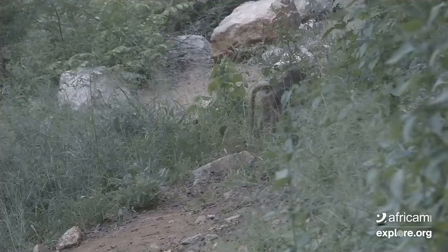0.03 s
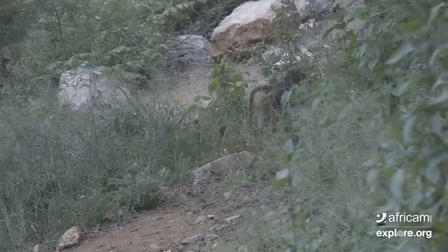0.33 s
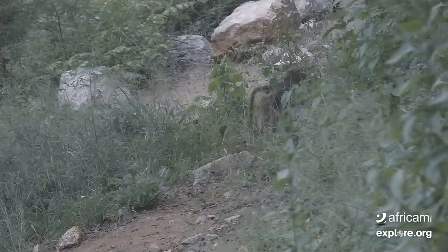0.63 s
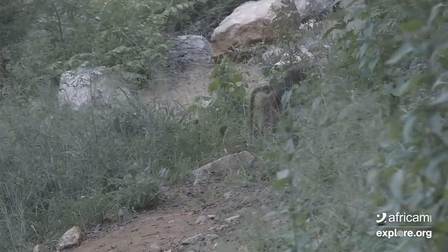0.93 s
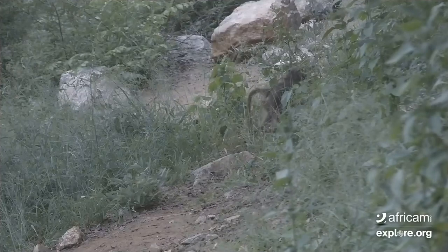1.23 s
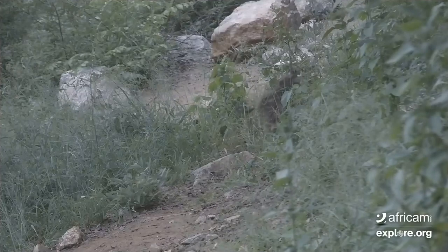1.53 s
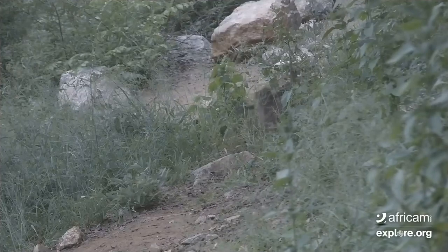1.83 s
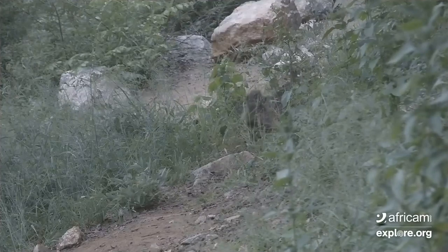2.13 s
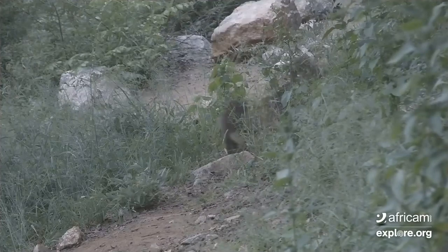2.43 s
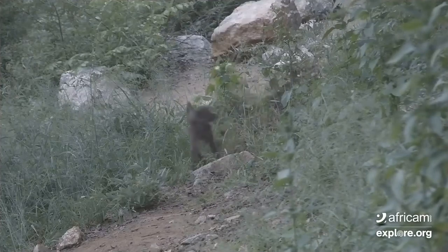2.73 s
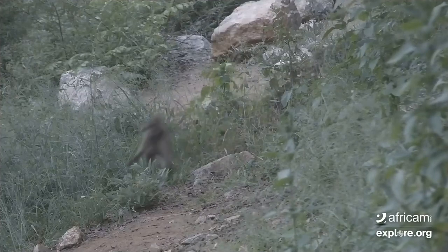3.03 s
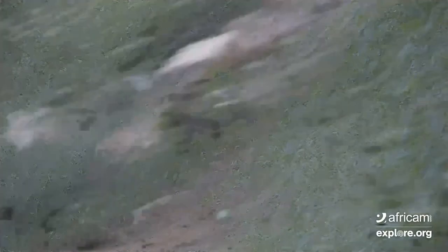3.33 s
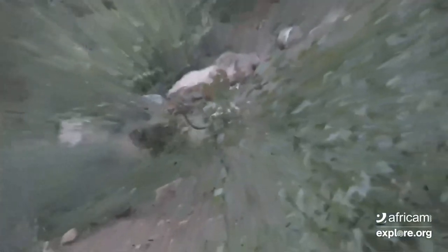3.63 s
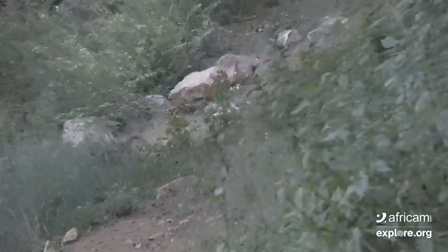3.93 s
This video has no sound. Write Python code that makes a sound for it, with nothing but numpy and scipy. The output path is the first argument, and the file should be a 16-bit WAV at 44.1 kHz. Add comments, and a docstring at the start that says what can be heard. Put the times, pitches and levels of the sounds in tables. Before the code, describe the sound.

Baboons scramble down a rocky slope, their dull footfalls and knocking stones light at first, then loudest from about 1.3 to 2.4 seconds, briefly overloading the microphone. Rubble shifts and plants rustle, with a faint low rumble. A twig snaps sharply at 2.6 seconds, and stones clatter again from 3.4 to 4. A songbird's quick whistles and chirping insects continue throughout, over steady hiss and a faint electrical whine.

```python
"""A rocky, overgrown slope, with baboons scrambling down it: feet knock dully, loose stones clack,
rubble shifts, plants brush aside and dry twigs snap. A songbird warbles in quick, arched whistles and
insects chirp in threes, over a trilling chorus of their kind and faint birds across the valley.
The outdoor microphone adds hiss, a thin whine and a mains sizzle, and overloads on the hardest knocks."""
import sys
import numpy as np
from scipy import signal
from scipy.fft import rfft, irfft
from scipy.io import wavfile

SR = 44100
rng = np.random.default_rng(int(sys.argv[2]) if len(sys.argv) > 2 else 0)


def transcribe(signal):
    """Save signal, clipped to [-1, 1], as a 16-bit WAV file at the path in sys.argv[1]."""
    frames = np.atleast_2d(signal).T
    limited = np.clip(frames, -1, 1)
    pcm = np.round(limited * 32767).astype(np.int16)
    wavfile.write(sys.argv[1], SR, pcm)


N = 176400

# tone of the stony ground (frequency [Hz], relative level [dB])
GROUND_TONE = [(20,-54),(50,-40),(80,-34),(150,-25.5),(300,-14),(450,-6),(630,2.5),(800,-5),(1100,-18),(1600,-19.5),(2500,-37.5),(5000,-57),(14000,-52)]
CHIRP_TOP_HZ, CHIRP_GAP_S = 5385, 0.0313


def amp(db):
    """Decibels to gain."""
    return 10 ** (np.asarray(db) / 20)


def unit(x):
    """Scales to rms 1."""
    return x / np.sqrt(np.mean(x ** 2) + 1e-20)


def add(mix, start, sound):
    """Mixes a sound in at start seconds."""
    part = mix[max(0, round(start * SR)):][:len(sound)]
    part += sound[:len(part)]


def fader(points):
    """Gain ride through (time [s], level [dB]) points."""
    return amp(np.interp(np.arange(N) / SR, *np.transpose(points)))


def colour(x, points):
    """Minimum-phase EQ of unit energy, shaped by (frequency [Hz], relative level [dB]) points."""
    hz, db = np.transpose(points)
    log_hz = np.log(abs(np.fft.fftfreq(4096, 1 / SR)) + 1)
    log_gain = np.log(amp(np.interp(log_hz, np.log(hz), db)))
    taps = np.fft.ifft(np.exp(np.conj(signal.hilbert(log_gain)))).real[:2048]
    return signal.oaconvolve(x, taps / np.linalg.norm(taps))[:len(x)]


def drift(rate_hz):
    """Smooth random motion of rms 1."""
    rolloff = 1 + (np.fft.rfftfreq(N, 1 / SR) / rate_hz) ** 4
    return unit(irfft(rfft(rng.standard_normal(N)) / rolloff, N))


def grains(per_s, spread_db):
    """Tiny impacts of uneven size at random times, rms 1."""
    size = amp(spread_db * np.minimum(rng.exponential(1, N), 4))
    return unit(size * rng.choice([-1, 1], N) * (rng.random(N) < per_s / SR))


def decay(t, t60):
    """Falls 60 dB in t60 seconds."""
    return np.exp(-np.log(1000) * t / t60)


def echoes(x, t60, wet_db):
    """Adds scattered reflections from rocks and bushes."""
    t = np.arange(SR // 2) / SR
    taps = rng.standard_normal(len(t)) * (rng.random(len(t)) < 1 / 20) * decay(t, t60) * (t > 0.004)
    return x + amp(wet_db) * signal.oaconvolve(x, taps / np.linalg.norm(taps))[:N]


def whistle(hz, fade_s=0.0024):
    """A sine along a pitch curve, with soft ends."""
    t = np.arange(len(hz)) / SR
    gate = np.sin(np.pi / 2 * np.minimum(np.minimum(t, t[-1] - t) / fade_s, 1))
    return np.sqrt(2) * gate * np.sin(2 * np.pi * np.cumsum(hz) / SR)


def knocks(thud_ratio=0.39, rubble_db=-11.5, rubble_rise_s=0.0019):
    """Each blow rings briefly, its pitch sinking as the contact softens, thuds, and stirs the rubble."""
    # feet and stones landing (time [s], level [dB], pitch [Hz], relative thud [dB], settling time [s])
    blows = [(0.175,-17.5,714,-8,0.3),(.317,-18.5,660,-9.5,0.057),(.578,-17,520,-11,0.048),(.606,-20.5,553,-12,0.08),(0.836,-12,660,-18,0.15),(.861,-10,605,-4,0.083),(1.013,-10.5,600,-16,.07),(1.175,-10.5,590,-18,0.09),
             (1.3145,-1.5,650,-14,0.074),(1.507,-12,584,-4,0.14),(1.5585,-4,710,-12,0.032),(1.576,-1,677,-24,0.14),(1.596,-8.5,720,-17.5,0.13),(1.629,-8,634,-23,0.098),
             (1.898,0.5,621,-13,0.18),(1.934,3,588,-16,0.11),(1.945,2,670,-17,0.11),(1.957,0,753,-19,0.088),(1.974,-1,615,-16,0.047),(2.0075,2.5,556,-24,0.093),
             (2.130,-1.5,620,-12,0.11),(2.145,-3,656,-20,0.11),(2.195,-5.5,763,-13,0.086),(2.347,2.5,704,-13,0.3),(2.4,-7,567,-24,0.12),(2.421,-8,560,-30,0.2),(2.45,-7,830,-22,0.051),(2.524,-7.5,645,-24,0.037),(2.7185,-1,693,-30,0.064),
             (3.07,-17.5,620,4.5,0.11),(3.142,-9,680,-3,0.15),(3.391,-7,673,-30,0.035),(3.438,-2.5,584,-21,0.061),(3.446,-4,527,-16,.09),(3.457,-6,628,-16,0.25),(3.51,-8.5,546,-31,0.22),
             (3.659,-10,640,-18,0.088),(3.706,-2.5,623,-26,0.039),(3.729,-2,400,-31,0.04),(3.754,-7.5,390,-23,0.055),(3.7805,-2,760,-14,0.07),(3.8055,-2,648,-12,0.1),(3.97,-2,673,-4.5,0.041)]
    t = np.arange(SR // 2) / SR
    bend = 1 + 0.16 * np.exp(-t / 0.0015)
    attack = 1 - np.exp(-t / 0.00035)
    stir_attack = 1 - np.exp(-t / rubble_rise_s)
    hits, stir = np.zeros((2, N))
    for start, db, hz, thud_db, settle in blows:
        phase = 2 * np.pi * np.cumsum(hz * bend) / SR
        ring = np.sin(phase) * decay(t, t60=0.032)
        thud = amp(thud_db) * np.sin(thud_ratio * phase) * decay(t, t60=0.019)
        add(hits, start, amp(db) * (ring - thud) * attack)
        add(stir, start, amp(db + rubble_db) * decay(t, settle) * stir_attack)
    hits = signal.lfilter(*signal.butter(1, 110, "high", fs=SR), hits)
    debris = colour(stir * grains(per_s=1500, spread_db=1.5), GROUND_TONE)
    return echoes(hits + debris, t60=0.17, wet_db=-8)


def clacks():
    """Stone meets stone: a hard, bright note that dies at once."""
    # stone strikes (time [s], level [dB], pitch [Hz])
    strikes = [(1.9338,-7,1350),(3.706,-12,1250),(3.7805,4,1100),(3.803,-13,2400),(3.97,-8,1700)]
    t, out = np.arange(SR // 20) / SR, np.zeros(N)
    for start, db, hz in strikes:
        attack = np.minimum(t * hz, 1)
        add(out, start, amp(db) * np.sin(2 * np.pi * hz * t) * decay(t, t60=0.016) * attack)
    return out


def rubble():
    """Small stones tumble against the ground in clumps."""
    # rubble shifting between the knocks (time [s], level [dB])
    shifting = [(0,-40.5),(.5,-35),(.62,-30),(.95,-25.5),(1.25,-20.5),(1.47,-28.5),(1.6,-16),(1.85,-23.5),(1.96,-17),(2.08,-15),(2.3,-21),(2.42,-22),(2.8,-22),(3.0,-22),(3.2,-19.5),(3.37,-27.5),(3.6,-27.5),(3.84,-18.5),(3.94,-24.5),(4,-13)]
    stones = grains(per_s=1100, spread_db=1)
    clumps = unit(amp(3.13 * drift(rate_hz=13.3)))
    return colour(stones * fader(shifting) * clumps, GROUND_TONE)


def rumble():
    """A low, uneven rumble, ending in a short bump as the sound cuts off."""
    # low swells and the closing bump (time [s], level [dB])
    swells = [(0,-72),(.7,-69),(1.45,-55),(1.58,-44.5),(1.85,-50),(1.96,-44),(2.1,-46),(2.36,-56),(2.6,-62),(2.75,-38.5),(2.9,-61),(3.15,-48),(3.35,-48.5),(3.75,-52),(3.92,-44),(4,-35)]
    # tone of the rumble (frequency [Hz], relative level [dB])
    low_tone = [(20,-12),(45,-36),(78,10),(100,4),(150,7.5),(250,-13),(500,-47),(14000,-87)]
    return colour(grains(per_s=1200, spread_db=2.5) * fader(swells), low_tone)


def plants():
    """Leaves and dry grass crackle in clumps."""
    # plants brushed aside (time [s], level [dB])
    brushing = [(0,-63),(.99,-29.5),(1.02,-20),(1.1,-27),(1.3,-27),(1.47,-34),(1.6,-28),(1.86,-28.5),(1.97,-19.5),(2.1,-27),(2.3,-32),(2.36,-22.5),(2.43,-33),(2.47,-25),(2.64,-20.5),(2.82,-20),(2.95,-29),(3.2,-28),(3.35,-31.5),(3.65,-31),(3.82,-26),(3.95,-31.5),(4,-17.5)]
    # tone of the foliage (frequency [Hz], relative level [dB])
    leaf_tone = [(60,-36),(300,-9.5),(800,14),(1500,4),(2500,4.5),(4000,-2.5),(6000,-2),(8000,-14.5),(14000,-56)]
    crackle = grains(per_s=3000, spread_db=-1.5)
    clumps = unit(amp(2 * drift(rate_hz=48)))
    return colour(crackle * fader(brushing) * clumps, leaf_tone)


def scrapes(half_width=0.19):
    """Feet scrape grit and bodies swish through grass: dense grains that swell fast and die away."""
    # scrapes and swishes (time [s], length [s], level [dB], band centre [Hz])
    strokes = [(1.02,0.25,-25,4900),(1.56,0.4,-29.5,1460),(1.95,0.15,-23,1980),(2.352,0.16,-34,6300),(2.432,0.31,-25,1530),(2.63,0.065,-24,5170)]
    out, grit = np.zeros(N), grains(per_s=6000, spread_db=5.5)
    for start, length, db, hz in strokes:
        progress = np.arange(0, length, 1 / SR) / length
        band = signal.butter(2, [hz * (1 - half_width), hz * (1 + half_width)], "band", fs=SR)
        texture = np.roll(unit(signal.lfilter(*band, grit)), -round(start * SR))[:len(progress)]
        envelope = np.minimum(progress / 0.054, 1) * np.sqrt(1 - progress)
        add(out, start, amp(db) * texture * envelope)
    return out


def twigs(crack_t60=0.0025, split_at_s=2.6235, split_db=-6):
    """Twigs crack with short splintering tails; the thickest splits right through with a bright tick."""
    # dry twigs snapping (time [s], crack level [dB], tail level [dB])
    snaps = [(1.014,-22,-19),(2.024,-20,-25),(2.535,-14,-30),(2.575,-8,-27),(2.6238,0,-13.5)]
    # tone of dry wood (frequency [Hz], relative level [dB])
    wood_tone = [(100,-34),(700,16),(1500,27),(4000,21.5),(5300,25),(7000,-16),(14000,-16)]
    t = np.arange(SR // 4) / SR
    force, tick = np.zeros((2, N))
    for start, crack_db, tail_db in snaps:
        add(force, start, amp(crack_db) * decay(t, crack_t60) + amp(tail_db) * decay(t, t60=0.087))
    add(tick, split_at_s, amp(split_db) * decay(t, 2 * crack_t60))
    return colour(force * rng.standard_normal(N), wood_tone) + tick * rng.standard_normal(N)


def songbird(flutter_hz=168.8, roughness_db=1.4):
    """Quick arched whistles, some buzzing with a fast, uneven pitch flutter."""
    # song notes (time [s], length [s], first pitch [Hz], middle pitch [Hz], last pitch [Hz],
    # level [dB], buzz depth [Hz])
    notes = [(0.208,0.038,4000,4050,4060,-24.5,150),(0.211,0.028,3800,3080,2550,-24.5,100),(0.247,0.055,2690,3424,2540,-20,30),(0.304,0.054,2595,2550,2620,-26.5,112),
             (.428,0.022,4030,3720,3520,-36,30),(.595,0.054,2900,2910,2810,-39,30),
             (0.751,0.013,4260,3190,2600,-27,30),(.765,0.025,2530,3105,2480,-21,30),(0.809,0.035,2280,3220,3440,-25.5,200),(.845,0.054,3450,3210,2990,-23,100),(.846,0.033,1860,1850,1690,-28,60),
             (0.898,0.017,3330,3720,4600,-27,100),(0.912,0.041,4440,3074,2530,-22.5,247),(0.94,0.054,2610,2880,3540,-30.5,200),
             (1.39,0.066,4100,3610,3300,-26,253),(1.416,0.085,3074,2900,2556,-29,120),(1.471,0.025,3050,3970,2870,-21.5,50),(1.488,0.051,2700,2725,2970,-25.5,150),
             (2.027,0.032,4360,3170,2640,-23.5,40),(2.097,0.017,3860,3860,3860,-22.5,30),(2.094,0.024,3050,2650,2600,-25,30.2),(2.117,0.04,2940,3240,2740,-26,40),(2.141,0.052,2710,2617,2730,-25,100),
             (2.631,0.022,3430,2935,2450,-23.5,40),(2.741,0.038,3540,3555,2460,-21.5,200),(2.786,0.046,2570,3060,2750,-21.5,50),(2.831,0.058,2900,2834,2930,-27,60),
             (3.111,0.029,3920,3030,2770,-24,40),(3.154,0.015,3020,2770,2290,-22.5,40),
             (3.402,0.027,4190,4070,3720,-25,150),(3.436,0.046,2850,3420,2690,-19.5,30),(3.483,0.052,2566,2620,2660,-24,130),
             (3.623,0.017,4460,3410,2690,-30.5,60),(3.64,0.026,2600,3030,2620,-23,30),(3.69,0.036,2900,3320,3380,-25,200),(3.724,0.039,3440,3244,2940,-23.5,170)]
    out, waver = np.zeros(N), drift(rate_hz=290)
    for start, length, first, middle, last, db, depth_hz in notes:
        t = np.arange(0, length, 1 / SR)
        arch_hz = np.polyval(np.polyfit([0, 0.5, 1], [first, middle, last], 2), t / length)
        jitter = np.roll(waver, -round(start * SR))[:len(t)]
        flutter = np.sin(2 * np.pi * flutter_hz * t) + 0.45 * jitter
        add(out, start, amp(db) * whistle(arch_hz + depth_hz * flutter))
    return echoes(out * amp(roughness_db * drift(rate_hz=180)), t60=0.12, wet_db=-8)


def chirp(top_hz, fall_hz=444, length_s=0.0212):
    """One insect chirp, sagging ever faster in pitch."""
    progress = np.linspace(0, 1, round(length_s * SR))
    return whistle(top_hz - fall_hz * progress ** 2, fade_s=length_s / 2)


def near_insects():
    """The nearest callers chirp in threes."""
    # insect calls (time [s], level [dB])
    calls = [(0.292,-18),(.533,-20.5),(.802,-19.5),(1.122,-19.5),(1.392,-19.5),(1.644,-21),(1.993,-21.5),(2.138,-26),(2.229,-31),(2.384,-28.5),(2.69,-27.5),(2.912,-30),(3.169,-26.5),(3.343,-18.5),(3.751,-27.5)]
    out = np.zeros(N)
    for start, db in calls:
        for beat in range(3):
            add(out, start + beat * CHIRP_GAP_S, amp(db) * chirp(CHIRP_TOP_HZ))
    return echoes(out, t60=0.11, wet_db=-19)


def insect_chorus(voices=3, chirps=150, level_db=-28, fade_db_per_s=1.5, swell_db=3.5):
    """Distant insects trill on, each at its own pitch and uneven pace; the lower ones are fainter."""
    out = np.zeros(N)
    for rank, (offset, pace) in zip(np.linspace(0, 1, voices), rng.random((voices, 2))):
        voice = np.zeros(N)
        gap = CHIRP_GAP_S * (1 + 0.2 * (pace - 0.5))
        top_hz = CHIRP_TOP_HZ - 520 * rank
        for beat, (late, sharp) in enumerate(rng.standard_normal((chirps, 2))):
            add(voice, (offset + beat) * gap + 0.003 * late, chirp(top_hz + 80 * sharp))
        out += voice * amp(-5 * rank + swell_db * drift(rate_hz=13))
    fade = amp(level_db - fade_db_per_s * np.arange(N) / SR)
    return fade * unit(echoes(out, t60=0.11, wet_db=-3))


def far_birds(count=70, note_s=0.0277, level_db=-43):
    """Faint short notes from across the valley, blurred by its echoes."""
    out, sweep = np.zeros(N), np.linspace(1, -1, round(note_s * SR))
    for when, pitch, glide, size in rng.random((count, 4)):
        centre_hz = 2700 + 650 * pitch ** 2
        bend = 1 + sweep * 0.1 * (glide - 0.35)
        add(out, when * N / SR, amp(2 * size) * whistle(centre_hz * bend))
    return amp(level_db) * unit(echoes(out, t60=0.59, wet_db=-1.5))


def hiss_and_whine(hiss_db=-30.5, waver_db=2.8, waver_rad=1.1):
    """The microphone's bed: steady hiss with thin, slightly wavering whines."""
    # tone of the outdoor hiss (frequency [Hz], relative level [dB])
    hiss_tone = [(20,-29),(80,-18),(115,-8),(160,7),(350,0.5),(650,11.5),(1200,6),(2000,2),(2900,9),(4000,6.5),(5000,16.5),(6000,5.5),(7000,2.5),(9000,-1.5),(11000,-4),(13500,-13.5)]
    # high whining tones (frequency [Hz], level [dB])
    whine_tones = [(6708,-53),(7091,-47.5),(7123,-50),(7228,-54),(7440,-51),(7530,-49.5),(7860,-51)]
    t, whine = np.arange(N) / SR, np.zeros(N)
    for hz, db in whine_tones:
        gain = amp(db + waver_db * drift(rate_hz=3.5))
        whine += gain * np.sin(2 * np.pi * hz * t + waver_rad * drift(rate_hz=18))
    return amp(hiss_db) * colour(rng.standard_normal(N), hiss_tone) + whine


def mains_sizzle(mains_hz=49.83, spark_width_s=0.00037, level_db=-41):
    """Electrical fizz: a pair of noise bursts in every half cycle of the mains."""
    # sparks in each mains cycle (time into the cycle [s], relative level [dB])
    sparks = [(.0027,0),(.0040,3.5),(0.0117,2),(0.0141,3.5)]
    # tone of the fizz (frequency [Hz], relative level [dB])
    fizz_tone = [(100,-48),(5500,-36),(7500,-9),(9300,1),(10500,-1.5),(11800,-11),(14000,-10)]
    cycle_time = np.arange(N) / SR % (1 / mains_hz)
    gate = sum(amp(db) * np.exp(-0.5 * ((cycle_time - at) / spark_width_s) ** 2) for at, db in sparks)
    return amp(level_db) * unit(colour(gate * rng.standard_normal(N), fizz_tone))


def scene():
    """The scramble, the wildlife and the noise bed, mixed in mono at one microphone."""
    scramble = knocks() + clacks() + rubble() + rumble() + plants() + scrapes() + twigs()
    wildlife = songbird() + far_birds() + near_insects() + insect_chorus()
    return (scramble + wildlife + hiss_and_whine() + mains_sizzle())[None]


def record(dry):
    """The input opens after an instant of silence, clips at full scale and loses the top treble."""
    open_s, cutoff_hz = 0.083, 13600
    clipped = np.clip(dry, -1, 1) * (np.arange(N) / SR >= open_s)
    lowpass = signal.firwin(601, cutoff_hz, window=("kaiser", 8), fs=SR)
    return signal.oaconvolve(clipped, lowpass[None], "same")


dry = scene()
out = record(dry)
transcribe(out)
```